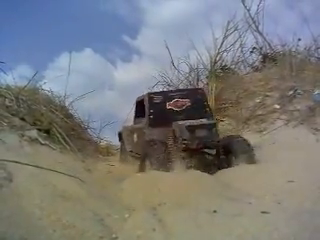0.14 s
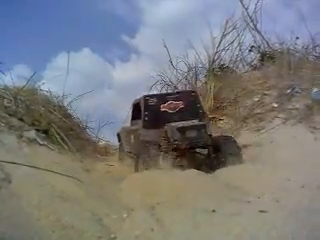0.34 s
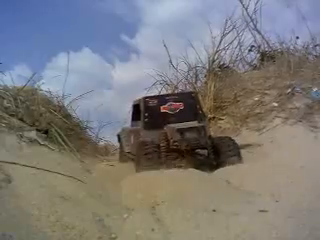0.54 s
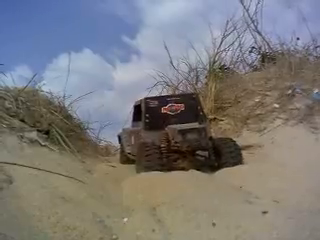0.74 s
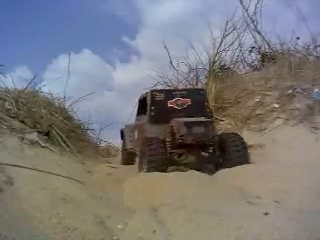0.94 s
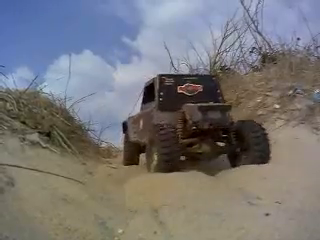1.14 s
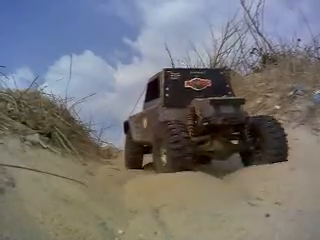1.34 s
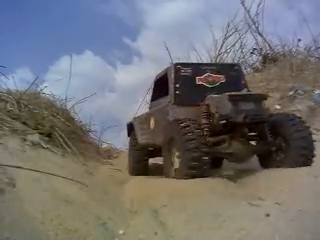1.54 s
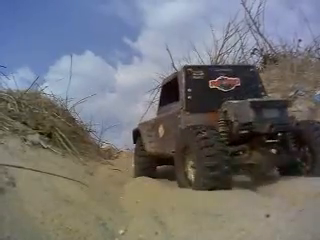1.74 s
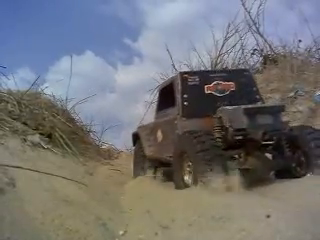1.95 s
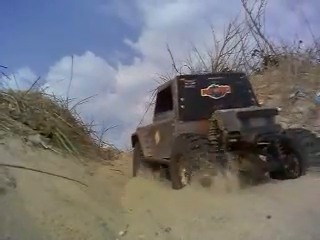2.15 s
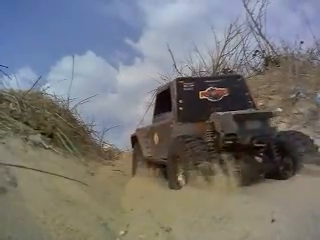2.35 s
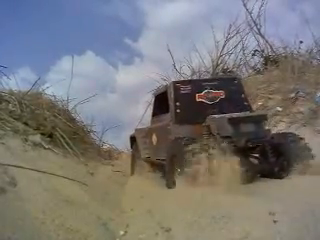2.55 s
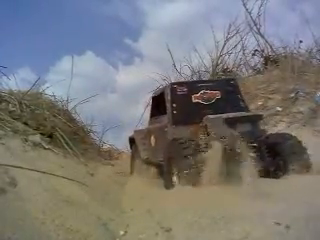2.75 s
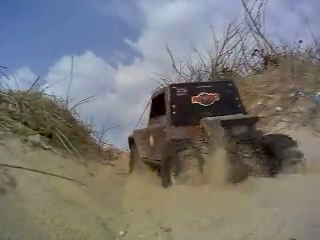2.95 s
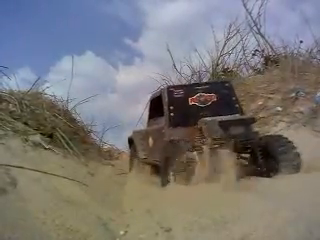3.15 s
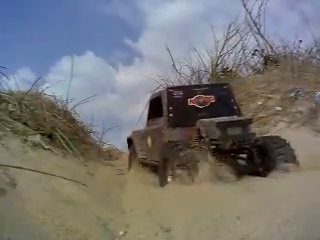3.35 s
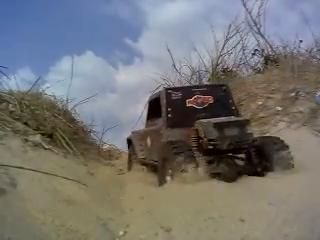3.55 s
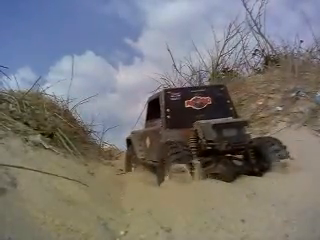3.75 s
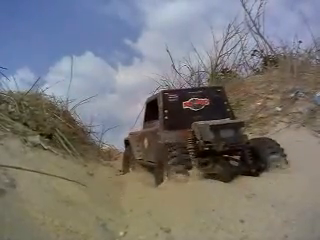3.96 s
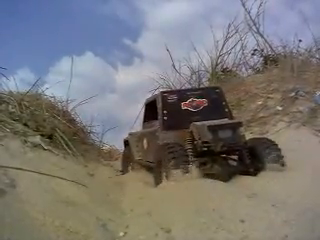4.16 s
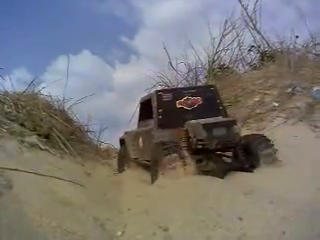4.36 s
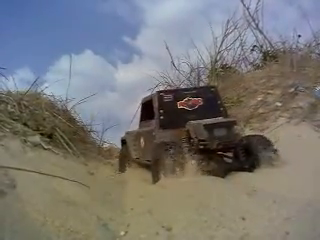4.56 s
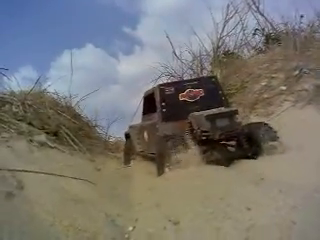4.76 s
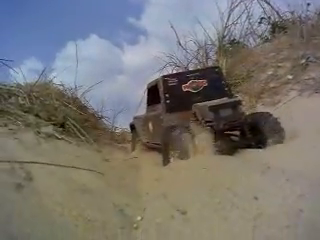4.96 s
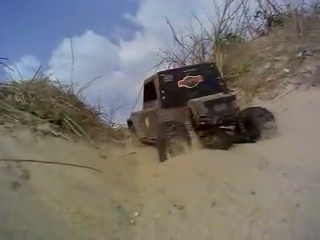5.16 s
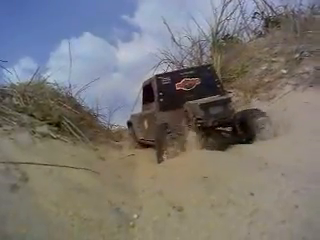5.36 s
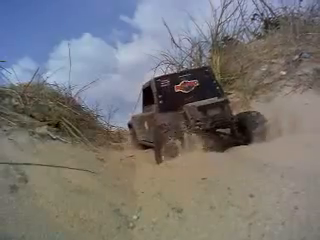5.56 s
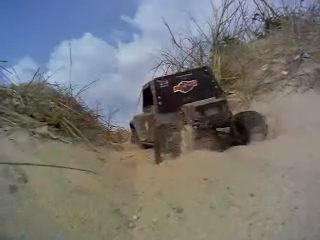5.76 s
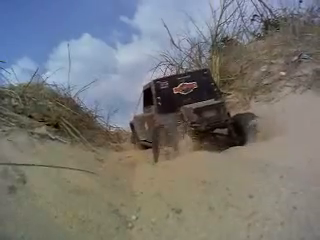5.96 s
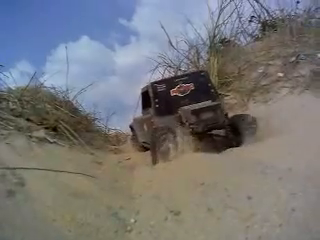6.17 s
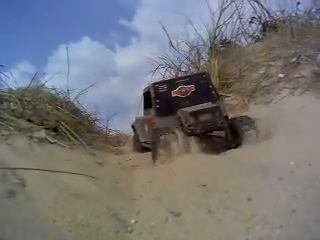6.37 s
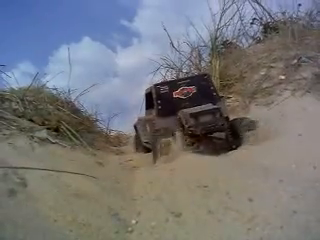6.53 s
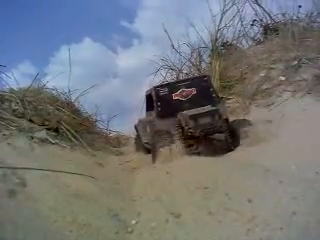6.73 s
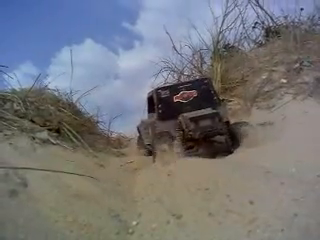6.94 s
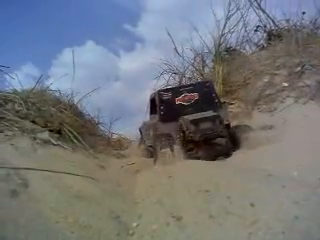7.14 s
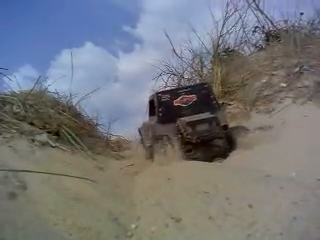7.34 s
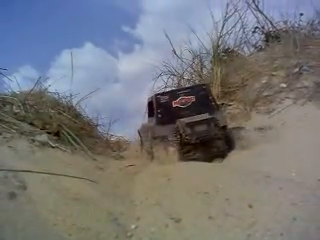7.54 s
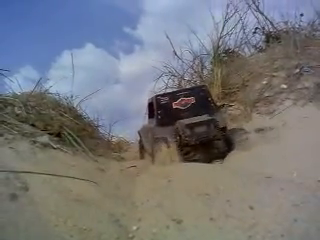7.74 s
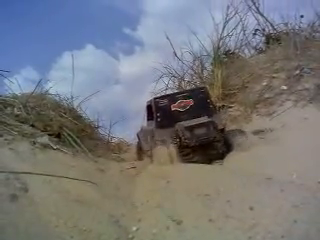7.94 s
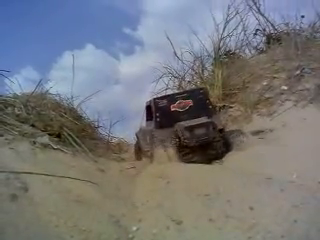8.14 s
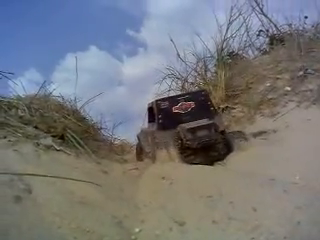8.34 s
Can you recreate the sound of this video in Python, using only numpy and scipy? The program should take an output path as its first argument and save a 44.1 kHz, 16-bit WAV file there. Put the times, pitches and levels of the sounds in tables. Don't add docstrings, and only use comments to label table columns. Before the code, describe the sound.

Wind rumbles on a small microphone while a model truck's motor whirs briefly, pauses, then pulls long with a throbbing, gritty whine.

```python
import sys
import numpy as np
from scipy import signal
from scipy.fft import rfft, irfft
from scipy.io import wavfile
from scipy.ndimage import uniform_filter1d

SR = 44100
rng = np.random.default_rng(int(sys.argv[2]) if len(sys.argv) > 2 else 0)


def digitize_waveform(pressure):
    field = np.atleast_2d(pressure).T
    bounded = np.clip(field, -1, 1)
    quanta = np.round(bounded * 32767).astype(np.int16)
    wavfile.write(sys.argv[1], SR, quanta)


def gain_from_db(level_db):
    decades = np.asarray(level_db, float) / 20
    return 10 ** decades


N = 374850
T = np.arange(N) / SR
HZ = np.maximum(np.arange(N // 2 + 1) * SR / N, 1)

# (time [s], whine [Hz], effort [dB])
REV = [
    (0, 1110, -64),
    (0.089, 1260, -45),
    (.16, 1275, -42),
    (.22, 1638, -42.5),
    (0.319, 2250, -36),
    (.44, 2515, -34.5),
    (.52, 2250, -39),
    (0.612, 1436, -40.5),
    (.715, 1050, -49),
    (.78, 890, -73),
]
# (time [s], lugs slipped [count], mean whine [Hz], speed swing [share of mean], effort [dB])
PULL = [(1.935, -0.52, 700, 0.022, -62.5), (1.99, 0, 898.8, 0.065, -47.5), (2.06, 1, 1118, 0.0706, -40),
        (2.42, 5, 1277, 0.0923, -40.5), (2.839, 10, 1447, .2, -40.5), (3.42, 17, 1254, 0.174, -42.5),
        (3.581, 19, 1090, 0.059, -41.5), (3.729, 21, 989, 0.1274, -45), (4.225, 28, 999.4, 0.1255, -44.5),
        (4.447, 31, 1037, .1, -45), (4.818, 36, 1243, 0.1094, -42.5), (5.155, 40, 1262, 0.14044, -43.5),
        (5.345, 43, 1319, 0.07, -42.5), (5.596, 46, 1361, 0.2004, -43), (6.279, 54, 1359, .18, -43.5),
        (6.861, 61, 1327, 0.137, -43.5), (7.389, 67, 1318, .14, -43.5), (8.49, 80, 1316, 0.11, -45.5)]
COAST_DB = -71


def unit(x):
    return x / np.sqrt(np.mean(x ** 2))


def tint(x, gain):
    return irfft(rfft(x) * gain, N)


def slope(table):
    hz, db = np.transpose(table)
    return gain_from_db(np.interp(np.log(HZ), np.log(hz), db))


def resonance(hz, width_hz):
    return 1 / (1 + (2 * (HZ - hz) / width_hz) ** 2)


def walk(rate):
    rate = np.clip(rate, .2, 200)
    steps = np.interp(T * rate, np.arange(2000), rng.standard_normal(2000))
    return unit(uniform_filter1d(steps, int(SR / rate)))


def bumps(rows, width):
    return sum(high * np.exp(-((T - s) / width) ** 2) for s, high in rows)


def wind():
    # (frequency [Hz], level [dB per Hz])
    wind_colour = [(12, -36.5), (22, -3), (60, 1), (140, -3), (200, -6.5), (260, -11), (330, -12.5),
                   (450, -16.5), (620, -24), (900, -27.5), (3260, -35), (4490, -48.5), (7170, -49.5)]
    # (time [s], level over the mean [dB])
    puffs = [(.04, -6), (.23, 4), (1.04, 6.5), (1.23, 1.5), (1.42, -10.5), (1.72, -5), (1.84, -8),
             (1.94, -1.5), (2.1, 4), (2.2, 7), (2.51, 3), (3.52, 4), (3.71, -4.5), (3.77, 6), (4.06, 6),
             (4.92, 2), (5.3, 7.5), (5.56, 3), (5.75, -5), (5.96, 6.5), (6.1, 0), (6.27, 7.5), (6.39, -3.5),
             (6.63, 2), (7.05, 3), (7.36, 4), (7.43, -2.5), (7.87, 1.5), (8.17, 1.5), (8.4, 6)]
    mean_db, surf_db = -39.5, -41
    gust_s, gust_wander_db, flutter_db = 0.034, 2.06, 0.71
    noise = rfft(unit(tint(rng.standard_normal(N), slope(wind_colour))))
    gust_db = mean_db + bumps(puffs, gust_s) + gust_wander_db * walk(6)
    out = 0
    for centre in 25 * 2. ** np.arange(6):
        octaves_away = np.log2(np.clip(HZ, 25, 800) / centre)
        share = np.cos(np.pi / 2 * np.clip(octaves_away, -1, 1)) ** 2
        near = 1 / (1 + (centre / 400) ** 2)
        band_db = near * (gust_db + flutter_db * walk(15)) + (1 - near) * surf_db
        out = out + irfft(noise * share, N) * gain_from_db(band_db)
    return out


def suspension_ticks():
    # (time [s], peak [dB], length [ms])
    ticks = [
        (0.957, -55, 3.2),
        (1.0425, -46.5, 2.6),
        (1.067, -55, 5.6),
        (1.5489, -52.5, 5),
        (1.789, -48.5, 3.2),
        (1.918, -57, 5.9),
    ]
    # (frequency [Hz], width [Hz], level [dB])
    tick_rings = [(1400, 300, 14), (3900, 340, 13), (4900, 500, 5.5), (6400, 680, 2)]
    noise = rng.standard_normal(N)
    bursts = np.zeros(N)
    for s, db, ms in ticks:
        bursts += gain_from_db(db + 5.0) * noise * (T > s) * np.exp(-np.abs(T - s) * 1000 / ms)
    return tint(bursts, sum(gain_from_db(db) * resonance(hz, width_hz) for hz, width_hz, db in tick_rings))


def wind_slaps():
    # (time [s], peak [dB], rate [Hz])
    slaps = [
        (1.912, -34, 75),
        (1.927, -31, 80),
        (1.943, -23, 70),
        (.714, -32, 130),
    ]
    out = np.zeros(N)
    for s, db, hz in slaps:
        cycle = (T - s) * hz
        suck = np.exp(-(cycle / 0.12) ** 2)
        rebound = 0.41 * np.exp(-((cycle - .5) / 0.27) ** 2)
        out += gain_from_db(db) * (rebound - suck)
    return out


def drive():
    # (time [s], whine [Hz], effort [dB], release [s])
    dabs = [
        (0.829, 891, -62.5, 0.0297),
        (.96, 889.8, -56, 0.04016),
        (1.06, 1090, -43, .06),
        (1.2, 792, -49.5, .07),
        (1.63, 965, -54.5, 0.029),
    ]
    # (time [s], swing lost [share])
    grips = [
        (3.796, .9),
        (4.024, 0.98),
        (4.164, 0.83),
        (4.383, 0.87),
        (4.754, .9),
        (5.25, 0.88),
    ]
    attack_s, grip_s = .035, 0.04564
    s, hz, db = np.transpose(REV + [(p[0], p[2], p[4]) for p in PULL])
    mean = np.interp(T, s, hz)
    gain = gain_from_db(np.interp(T, s, db)) + gain_from_db(COAST_DB)
    for at, dab_hz, dab_db, release_s in dabs:
        rise, fall = np.exp(-((T - at) / attack_s) ** 2), np.exp(-np.abs(T - at) / release_s)
        shape = np.where(T < at, rise, fall)
        mean = mean + (dab_hz - mean) * np.sqrt(shape)
        gain = gain + gain_from_db(dab_db) * shape
    s, lug_count, _, swing_share, _ = np.transpose(PULL)
    lugs = np.interp(T, s, lug_count)
    slipping = np.clip(1 - bumps(grips, grip_s), 0, 1)
    swing = np.interp(T, s, swing_share) * (T > s[0]) * slipping
    return mean, lugs, swing, np.log10(gain) * 20


def speed(mean, lugs, swing):
    scatter, jitter = .18, .04
    chance = rng.standard_normal((200, 2)).T
    size, late = (np.interp(2 * lugs + 2, np.arange(200), c) for c in chance)
    wave = np.cos(2 * np.pi * (lugs + jitter * late))
    slip = swing * (wave - scatter * size * (1.3 - wave))
    judder_hz, judder_s, judder_lasts_s, judder_share = 21, .432, .17, .085
    since = T - judder_s
    judder = judder_share * np.exp(-(since / judder_lasts_s) ** 4) * np.cos(2 * np.pi * judder_hz * since)
    return mean * (1 + slip + judder)


def drumming(mean, lugs, swing, effort_db):
    # (time [s], level over the effort [dB])
    bites = [(.22, 7.5), (.685, 5.5), (2.25, 2.5), (2.77, 4), (2.86, 2.5), (2.93, 2.5), (3.22, 4),
             (4.07, 5.5), (4.21, -1.5), (4.31, 2), (4.5, 3), (4.65, 3.5), (4.85, 2.5), (5.04, 1.5),
             (5.25, -0.5), (5.94, 4), (6.2, 2), (6.27, 6.5), (6.42, 2.5), (8.33, -0.5), (8.4, 4)]
    bite_s, slip_db, slip_lag = 0.013, 6, 0.28
    beat_db = slip_db * swing * np.cos(2 * np.pi * (lugs - slip_lag)) + bumps(bites, bite_s)
    drum_db = effort_db + beat_db + 0.74 * walk(22) + 0.48 * walk(45)
    brighter_db = 3 * np.tanh(np.log2(mean / 1300))
    hiss_db = effort_db + 0.78 * beat_db - 4.5 + brighter_db + 0.64 * walk(40)
    hiss_db = np.log10(gain_from_db(hiss_db) + gain_from_db(COAST_DB - 7.5)) * 20
    return drum_db, hiss_db


def singing(mean, lugs, swing, effort_db):
    sing_db = (-1, 3, 7)
    loss_db, free_db = (8, 20, 34), (16, 12, -4)
    rev_db, roll_back_db = (-3, -4, -16), (-4, -16, -13)
    turned_db = (-1, 1, 3)
    break_db, wander_db = 1.5, .4
    start_db, let_go_s, let_go_db = -52, .61, -8
    rev_end = REV[-1][0]
    running_db = 0.71 * np.clip(effort_db - start_db, -11, 0)
    running_db = running_db + let_go_db * ((T > let_go_s) & (T < rev_end))
    free = swing * np.cos(2 * np.pi * lugs)
    turned = np.interp(T, (6.3, 7.1), (0, 1))
    revving = (T < rev_end) * np.clip(np.log2(mean / 1300), 0, 1)
    rolling = (T > rev_end) & (T < PULL[1][0])
    groups = []
    for g in range(3):
        db = sing_db[g] + running_db - loss_db[g] * swing + free_db[g] * free
        db = db + rev_db[g] * revving + roll_back_db[g] * rolling + turned_db[g] * turned
        groups.append(db + wander_db * walk(4) + break_db * walk(35))
    return groups


def motor_tones(turn, sing_db):
    # (pushes per shaft turn [count], level [dB])
    orders = [(1, 9), (2, 3.5), (3, 2.5), (4, 12.5), (5, -4.5), (6, 3), (7, -2), (8, 7.5), (10, -2),
              (11, -5), (12, -6), (12, 6), (16, -0.5)]
    flicker_db = 1.6
    tones = 0
    for k, db in orders:
        group = (k > 6) + (k > 8)
        level_db = db - 23 + sing_db[group] + flicker_db * (walk(60) + walk(200))
        tones = tones + gain_from_db(level_db) * np.sin(k * turn + rng.uniform(0, 2 * np.pi))
    return tones


def gears_and_sand(turn, hz):
    grind = rng.standard_normal(N) * (1 + .3 * np.cos(turn)) * gain_from_db(0.071 * walk(25))
    sand = rng.standard_normal(N) * (rng.random(N) < .08)
    surge = (hz / uniform_filter1d(hz, SR // 6)) ** 0.99
    return surge * (grind + .6 * unit(sand) * gain_from_db(2.4 * walk(50)))


def swell(sung, ground, db):
    tone, grit = irfft(sung, N), irfft(ground, N)
    quick_db = .8 * (db - uniform_filter1d(db, SR // 14))
    return (tone * gain_from_db(db + quick_db) + grit * gain_from_db(db - quick_db)) / np.std(tone + grit)


def truck():
    # (frequency [Hz], width [Hz], level over the colour [dB])
    body = [(754, 330, 2), (967, 157, 7.5), (1090, 42, 6.5), (1327, 60, 6), (1760, 160, 4), (2250, 660, 3),
            (2730, 55, 5.5), (3250, 250, 6.5), (3614, 840, 4.5), (5256, 420, 6)]
    # (frequency [Hz], level [dB])
    colour = [(200, -6.5), (450, -4), (650, -0.5), (900, 3), (1200, -4.5), (1550, -7.5), (2900, -15.5),
              (4200, -12.5), (4900, -18.5), (6200, -20.5), (7300, -30.5)]
    # (frequency [Hz], level [dB])
    mount = [(350, 6), (600, -3.5), (800, 3.5), (950, -6), (1200, 1.5), (1520, -10), (1700, -6.5),
             (1900, -1), (2330, -2.5), (2550, 8), (2850, 3.5), (3300, -3.2), (4000, 2), (4700, 0.5)]
    split_hz, top_hz = 1550, 4300
    motion = drive()
    hz = speed(*motion[:3])
    drum_db, hiss_db = drumming(*motion)
    turn = 2 * np.pi * np.cumsum(hz * (1 + .009 * walk(180))) / (4 * SR)
    tones = motor_tones(turn, singing(*motion))
    noise = gears_and_sand(turn, hz)
    rings = 1 + sum((gain_from_db(db) - 1) * resonance(f, width_hz) for f, width_hz, db in body)
    sung = slope(colour) * rings ** 2 * slope(mount) * rfft(tones)
    ground = slope(colour) * rings * rfft(noise)
    low = 1 / (1 + (HZ / split_hz) ** 8)
    drum = swell(sung * low, ground * low, drum_db)
    hiss = swell(sung * (1 - low), ground * (1 - low), hiss_db)
    top = tint(hiss, 1 / (1 + (top_hz / HZ) ** 8))
    bright_db = 0.23 * (hiss_db + 51.0) + 0.69 * walk(12)
    return drum + hiss + top * (gain_from_db(bright_db) - 1)


def scene():
    return (wind() + suspension_ticks() + wind_slaps() + truck())[None]


def band_limit(x):
    return signal.sosfilt(signal.butter(12, 9150, fs=SR, output="sos"), x)


def record(dry):
    edge_hz, camera_rate_hz, mirror_db = 7445, 16000, -17.5
    band = tint(dry[0], 1 / np.sqrt(1 + (HZ / 7350) ** 60) * (HZ < edge_hz))
    flipped = band * np.cos(2 * np.pi * camera_rate_hz * T)
    mirror = tint(flipped, np.exp(-((HZ - 8720) / 250) ** 4))
    mix = (band + gain_from_db(mirror_db) * mirror)[None]
    return band_limit(mix)


dry = scene()
out = record(dry)
digitize_waveform(out)
```